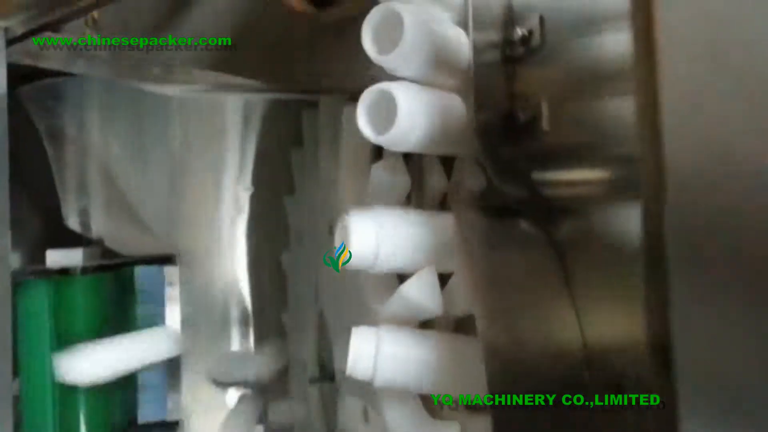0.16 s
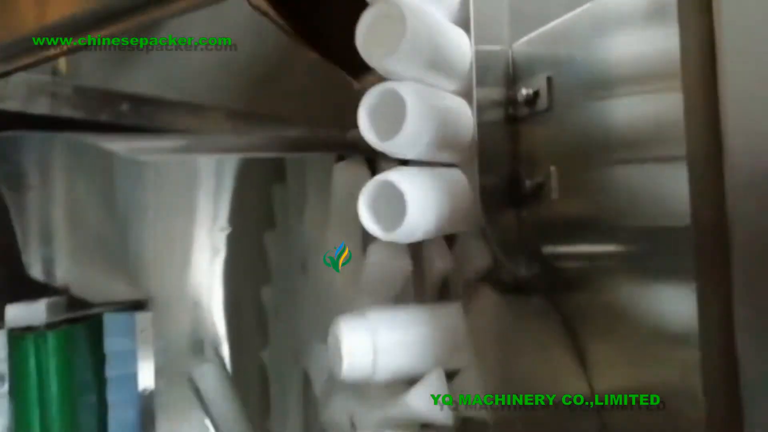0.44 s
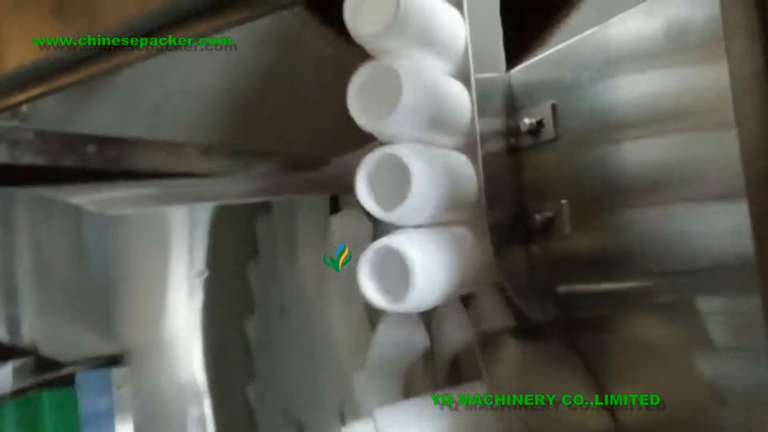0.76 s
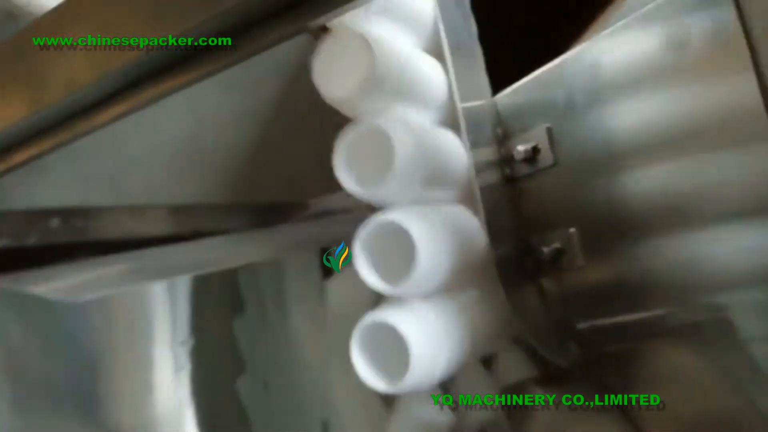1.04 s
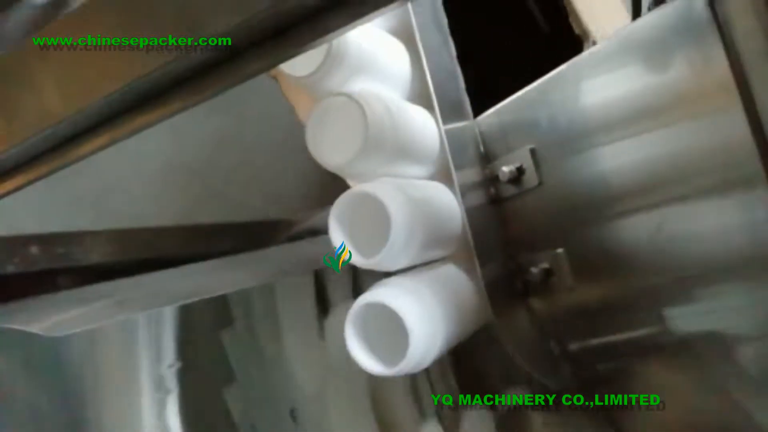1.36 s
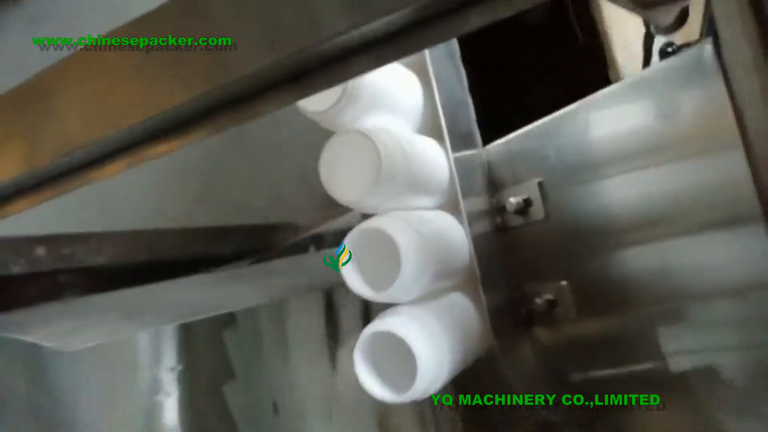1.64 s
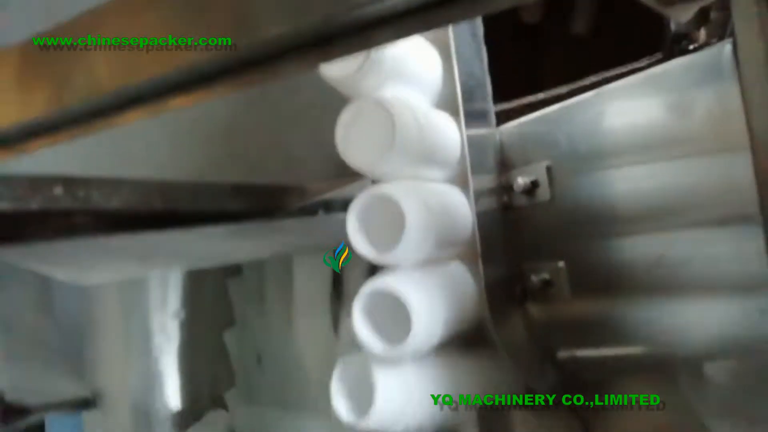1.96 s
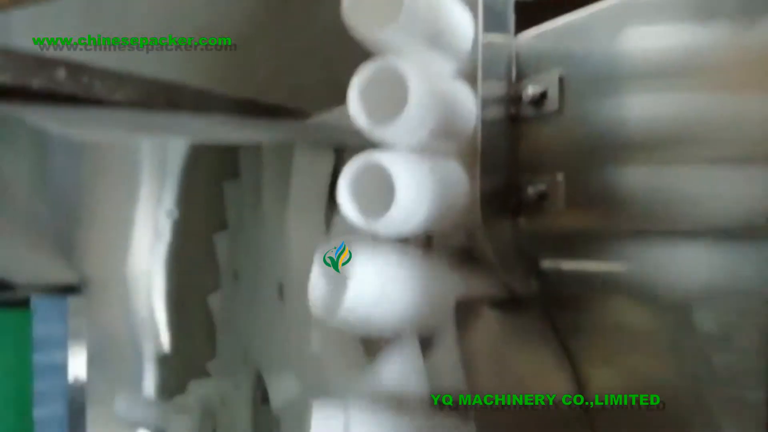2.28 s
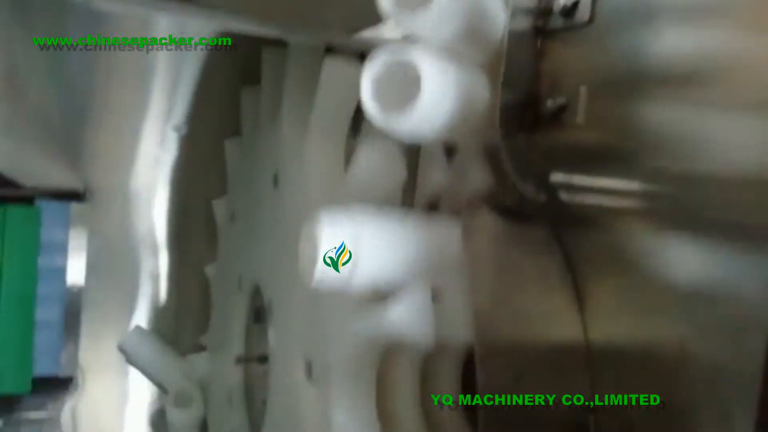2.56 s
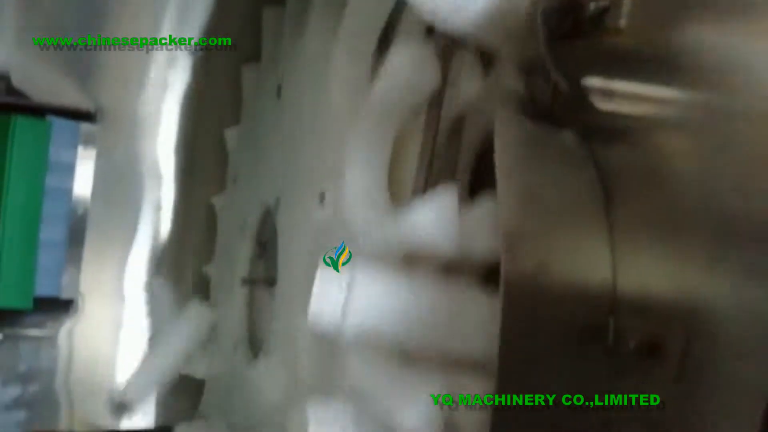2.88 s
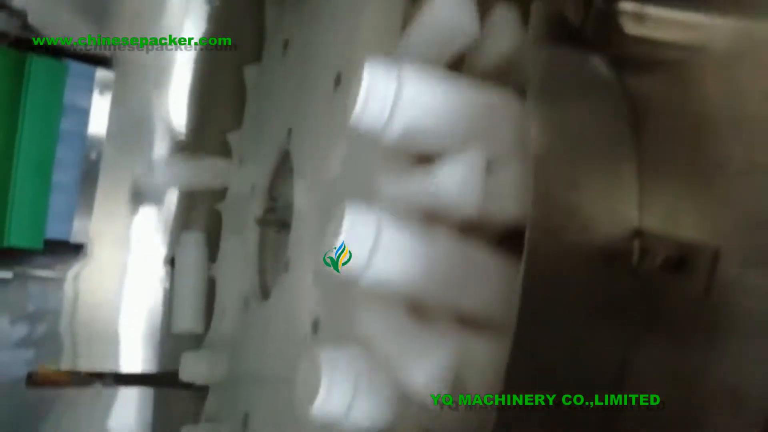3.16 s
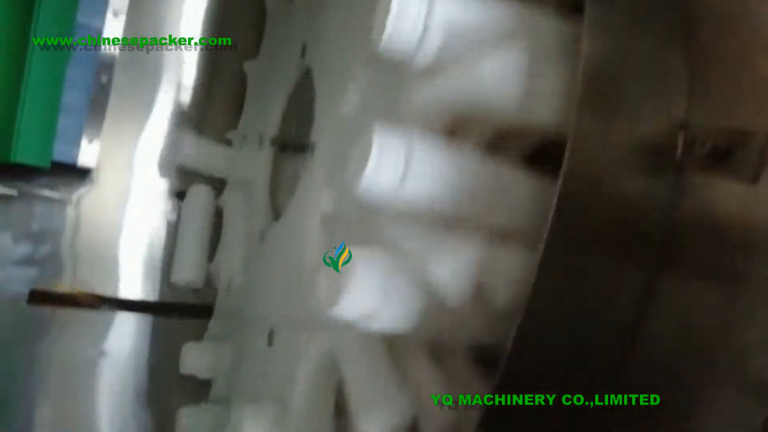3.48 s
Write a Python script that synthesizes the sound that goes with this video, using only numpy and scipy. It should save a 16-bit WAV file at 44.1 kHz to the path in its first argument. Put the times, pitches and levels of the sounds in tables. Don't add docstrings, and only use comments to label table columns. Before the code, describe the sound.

Empty plastic bottles tumble and rattle continuously in a rotary sorter, clacking on a rail and thumping on a plate, while an air jet hisses unevenly over drum rumble; close stereo microphones in a factory hall.

```python
import sys
import numpy as np
from scipy import signal
from scipy.fft import rfft, irfft
from scipy.io import wavfile

SR = 44100
rng = np.random.default_rng(int(sys.argv[2]) if len(sys.argv) > 2 else 0)


def persist_wave(psi):
    counts = np.round(np.clip(psi, -1, 1) * 32767).astype(np.int16)
    wavfile.write(sys.argv[1], SR, np.atleast_2d(counts).T)


def how_loud(loudness_db):
    steps = np.asarray(loudness_db, float) / 20
    return 10 ** steps


N = 159642

# t/s, spread/s, change/dB
WALL_SPLASHES = [(0.042, 0.017, -3.5), (0.317, 0.0069, 8.5), (0.361, 0.011, -1.5), (0.393, 0.0078, 6),
                 (0.439, 0.046, -5.5), (0.541, 0.02, 8.5), (0.664, 0.022, 7), (0.746, 0.058, -1),
                 (0.898, 0.029, 7), (1.08, 0.074, 3), (1.197, 0.015, 6.5), (1.383, 0.018, 8.5),
                 (1.481, 0.0092, 0), (1.704, 0.034, 4.5), (1.954, 0.0035, 12.5), (2.063, 0.028, 2),
                 (2.141, 0.14, 0), (2.283, 0.017, 8.5), (2.343, 0.053, -3.5), (2.42, 0.071, 3.5),
                 (2.616, 0.0049, 6.5), (2.772, 0.016, 7), (2.949, 0.1, -0.7), (3.113, 0.016, 4.5),
                 (3.468, 0.061, 1.5), (3.6, 0.017, 3)]
# t/s, spread/s, change/dB
HEAP_SLIDES = [(0.188, 0.072, 4.5), (0.315, 0.043, 4.5), (0.427, 0.018, -5), (0.637, 0.0058, 0.5),
               (0.74, 0.14, 7), (1.046, 0.036, -6.5), (1.203, 0.032, 6.5), (1.401, 0.011, 5.5),
               (1.535, 0.0096, 5), (1.7, 0.16, 5), (1.974, 0.054, 5), (2.149, 0.13, 8),
               (2.736, 0.032, -2.5), (3.316, 0.0072, 11.5), (3.504, 0.05, -3), (3.61, 0.013, 6.5)]
# t/s, spread/s, change/dB
HEAP_RESTS = [(0.07, 0.0091, -3), (0.565, 0.011, -4), (0.93, 0.0082, -5.5), (1.315, .02, -1.5),
              (1.45, .015, 0.5), (1.79, 0.0078, 1), (2.075, 0.015, -4), (2.32, 0.011, -5),
              (2.57, 0.017, -2.5), (2.67, 0.025, -3.5), (2.86, 0.016, -3.5), (3.26, 0.014, -2),
              (3.375, 0.016, -4.5), (3.555, 0.012, -4)]


def in_bumps(rows):
    t = np.arange(0, N + 64, 64) / SR
    db = sum(change * np.exp(-.5 * ((t - centre) / spread) ** 2) for centre, spread, change in rows)
    return np.interp(np.arange(N) / SR, t, db)


def rms_one(x):
    return x / np.sqrt(np.mean(x ** 2) + 1e-20)


def at_hz(points, hz):
    points = np.array(points)
    return np.interp(np.log(hz + 1), np.log(points[:, 0]), points[:, 1])


def drift(rate):
    pole = np.exp(-80 * np.pi * rate / SR)
    noise = rng.standard_normal(N // 40 + 2002)
    slow = signal.lfilter([1], [1, -2 * pole, pole * pole], noise)[2000:]
    return np.interp(np.arange(N) / 40, np.arange(len(slow)), rms_one(slow))


def turbulence(spectrum, patchy_db, rate, swing_db, swing_hz, fade, count=2.5):
    hz = np.fft.rfftfreq(N, 1 / SR)
    low, high = spectrum[0][0], spectrum[-1][0] * 1.2
    band_limit = np.sqrt((1 + (low / (hz + 1)) ** 8) * (1 + (hz / high) ** 8))
    colour = how_loud(at_hz(spectrum, hz)) / band_limit
    noise = rfft(rng.standard_normal((2, N))) * colour
    place = count * np.log2((hz + 1) / 20)
    audible = place[colour > .003]
    out = 0
    for k in range(int(audible.min()), int(audible.max()) + 2):
        share = np.cos(np.clip(place - k, -1, 1) * np.pi / 2) ** 2
        octaves_off = abs(k / count - np.log2(swing_hz / 20))
        level_db = patchy_db * drift(rate) + swing_db * max(1 - fade * octaves_off, 0)
        out = out + how_loud(level_db) * irfft(noise * share, N)
    return rms_one(out)


def jet():
    # t/s, spread/s, change/dB
    shades = [(0.018, 0.023, -2), (0.313, 0.0062, 4), (0.347, 0.012, -2.5), (0.425, 0.054, -10.5),
              (0.115, 0.0043, -6), (0.2, 0.023, 1), (1.22, 0.037, 0), (1.32, 0.038, 2.5),
              (3.14, 0.011, -0.5), (0.653, 0.02, 4), (0.746, 0.088, -3), (0.91, 0.0062, 4),
              (1.046, 0.012, -4), (1.363, 0.0042, 4.5), (1.441, 0.041, -1.5), (1.562, 0.0061, -6.5),
              (1.696, 0.042, 2.5), (1.742, 0.0083, -10), (1.9, 0.0025, -11), (2.061, 0.016, 5.5),
              (2.139, 0.062, -4), (2.295, 0.011, 2), (2.405, 0.01, 7), (2.444, 0.0074, -5),
              (2.504, 0.027, 2), (2.628, 0.047, 3.5), (2.758, 0.018, 5.5), (2.808, 0.0076, -7),
              (3.037, 0.075, 4), (3.406, 0.083, 3), (3.54, 0.028, -2)]
    # f/Hz, level/dB
    core_spectrum = [(4000, -10.5), (5200, -10.5), (5790, -14), (7000, -1.5), (8000, 3), (10100, -14),
                     (14400, -23.5), (16500, -25)]
    # f/Hz, level/dB
    splash_spectrum = [(800, -9), (1380, -6.5), (1650, -2), (2300, -1), (2650, -2.5), (3580, -4),
                       (4800, -4.5), (6500, -1.5), (9500, -19)]
    core_db, splash_db = -14.5, -22
    flutter_db = .7 * drift(30)
    core_swing_db = in_bumps(shades) + flutter_db
    core = turbulence(core_spectrum, 1.73, 15.4, core_swing_db, swing_hz=6700, fade=0.093, count=6)
    splash_swing_db = 1.03 * in_bumps(WALL_SPLASHES) + 1.07 * in_bumps(HEAP_RESTS) + flutter_db
    splash = turbulence(splash_spectrum, 2.12, 24.5, splash_swing_db, swing_hz=3760, fade=0.098)
    return how_loud(core_db) * core + how_loud(splash_db) * splash


def drum():
    # f/Hz, level/dB
    rumble_spectrum = [(25, -15), (75, -15), (125, -6.5), (180, -3.5), (395, -0.5), (466, 3), (700, -1.5),
                       (1300, -3.5)]
    rumble_db = -27.5
    swing_db = 0.78 * in_bumps(HEAP_SLIDES) + 0.28 * in_bumps(WALL_SPLASHES) + 1.8 * in_bumps(HEAP_RESTS)
    return how_loud(rumble_db) * turbulence(rumble_spectrum, 3.44, 12, swing_db, swing_hz=500, fade=0.063)


def ring(clicks, hz, t60):
    r, w = how_loud(-60 / (t60 * SR)), 2 * np.pi * hz / SR
    return signal.lfilter([0, np.sin(w)], [1, -2 * r * np.cos(w), r * r], clicks + 1e-18)


def rattle():
    # f/Hz, level/dB, t60/s
    hollows = [(173, -2, 0.12), (235, -18, 0.14), (318, -6, 0.055), (469.2, 2.5, 0.17), (579, -9.5, 0.056),
               (691.6, -6, 0.19), (1290, 8.5, 0.017), (1500, 9.5, 0.033), (1700, -5.5, 0.17),
               (2257, 3, 0.075), (3770, -1.5, 0.028)]
    contacts_per_s, rattle_db, spread_db = 250, -31, 6.5
    slide_db = in_bumps(HEAP_SLIDES) + 0.89 * in_bumps(HEAP_RESTS)
    splash_db = in_bumps(WALL_SPLASHES)
    touch = rng.random((2, N)) < contacts_per_s * how_loud(3.0 * drift(7)) / SR
    out = np.zeros((2, N))
    for hz, db, t60 in hollows:
        strength = how_loud(spread_db * np.minimum(rng.exponential(1, (2, N)), 2.6))
        sign = rng.choice([-1, 1], (2, N))
        effort_db = 0.62 * slide_db if hz < 800 else 0.56 * splash_db + 0.75 * slide_db
        out += ring(strength * sign * touch * how_loud(db + effort_db + 2.2 * drift(10.5)), hz, t60)
    return how_loud(rattle_db) * rms_one(out)


def blow(s, db, hz, t60, crack_db, draw):
    rise_s, crack_s = 0.00054, 0.0013
    t = np.arange(int(.2 * SR)) / SR
    modes = [(1, 1), (.35, 1.12 + .06 * draw[0]), (.2, .85 + .05 * draw[1])]
    body = sum(gain * np.sin(2 * np.pi * hz * ratio * t) for gain, ratio in modes)
    body = body * how_loud(-60 * t / t60) * (1 - np.exp(-t / rise_s))
    crack = signal.lfilter([.5, 0, -.5], [1, -1.3, .6], draw[2:len(t) + 2])
    crack = crack * np.exp(-t / crack_s) * how_loud(crack_db)
    out, start = np.zeros(N + len(t)), int(s * SR)
    out[start:start + len(t)] = how_loud(db) * (body + crack)
    return out[:N]


def thumps():
    # t/s, peak level/dB, f/Hz
    landings = [(0.175, -17.5, 455), (0.606, -16, 192), (0.64, -18.5, 159), (0.717, -22, 361),
                (0.746, -18.5, 183.5), (1.201, -19, 472), (1.387, -17, 288), (1.532, -13.5, 243),
                (1.543, -12.5, 338), (1.931, -18.5, 346), (3.146, -20.5, 353), (3.3, -17, 365),
                (3.318, -17, 204), (3.597, -17, 396), (0.087, -27, 464), (0.479, -26, 470),
                (0.965, -24.5, 304), (1.265, -24, 242), (1.621, -22, 404), (1.865, -24.5, 384),
                (1.994, -26, 470), (2.119, -25, 433), (2.156, -18.5, 342), (2.491, -24, 193),
                (2.6, -25, 465), (2.898, -24.5, 174), (2.939, -22.5, 315), (3.604, -21, 212),
                (0.672, -21, 213), (0.722, -19.5, 226), (0.772, -21, 375), (1.408, -25, 221),
                (1.566, -22.5, 295), (1.713, -22.5, 347), (2.029, -29, 168), (2.271, -21.5, 188),
                (2.13, -25, 176), (2.2, -23, 173)]
    draws = rng.standard_normal((len(landings), SR // 4)).clip(-3, 3)
    return sum(blow(s, db - 3, hz, 0.14, -46, draw) for (s, db, hz), draw in zip(landings, draws))


def clacks():
    # t/s, peak level/dB, f/Hz
    knocks = [(0.0915, -7.5, 1525), (0.105, -19, 1740), (0.1246, -11, 2280), (0.181, -16, 1550),
              (0.2728, -15.5, 1720), (0.3128, -15, 1515), (0.3884, -10, 2270), (0.8021, -5.5, 1533),
              (0.8589, -12.5, 2060), (0.9408, -14.5, 1680), (1.1722, -14, 1700), (1.1977, -10, 1700),
              (1.346, -13.5, 1460), (1.424, -11, 1525), (1.6157, -14.5, 2050), (1.8334, -12.5, 1250),
              (1.8704, -11, 1690), (2.259, -11, 1714), (2.61, -16, 1430), (3.2101, -15, 1500),
              (3.2839, -15.5, 930), (3.579, -11.5, 1713), (0.366, -15, 1910), (0.484, -18.5, 1540),
              (0.515, -18, 969), (0.597, -18.5, 1080), (0.642, -23, 1630), (0.748, -22, 880),
              (0.831, -17, 1130), (0.878, -12, 1390), (1.129, -21, 1560), (1.389, -15.5, 1130),
              (1.535, -20, 1260), (1.641, -25, 1600), (1.705, -19, 1630), (1.95, -17, 1860),
              (2.156, -21, 920), (2.175, -17, 820), (2.274, -15, 1310), (2.451, -16, 1170),
              (2.849, -17.5, 1680), (2.924, -16.5, 1490), (3.148, -16, 1520), (3.173, -20.5, 1470),
              (3.287, -13, 1415), (1.824, -14, 885), (1.936, -20, 1500), (2.024, -18, 1610),
              (2.5, -15, 1600), (2.808, -18, 2090), (2.99, -23, 1500), (3.425, -19, 1700),
              (1.427, -13, 3900), (1.703, -17, 4600), (1.951, -9, 3500), (3.105, -15, 5000)]
    draws = rng.standard_normal((len(knocks), SR // 4)).clip(-3, 3)
    out = np.zeros((2, N))
    for (s, db, hz), draw in zip(knocks, draws):
        pan = how_loud(3.7 * draw[2] * np.array([[1], [-1]]))
        out += blow(s, db - 1, hz, 0.04, -2, draw) * pan
    out[0] = np.roll(out[0], 5)
    return out


def slaps():
    # t/s, peak level/dB, f/Hz
    flat_landings = [
        (0.1969, -17.5, 684),
        (1.5178, -11, 655),
    ]
    t = np.arange(N) / SR
    out = np.zeros(N)
    for s, db, hz in flat_landings:
        bell = np.exp(-.5 * ((t - s) * hz * 3.2) ** 2)
        out += how_loud(db + 9) * np.sin(2 * np.pi * hz * (t - s)) * bell
    return out


def ports(field):
    # f/Hz, likeness/1
    likeness = [(60, .93), (300, .78), (520, .85), (730, .3), (1400, .7), (2400, .65), (3100, .2),
                (9000, .12)]
    # f/Hz, lead/rad
    lead = [(100, .01), (260, 0.059), (600, 3.08), (860, 0.33), (1810, 0.87), (2410, 2.26), (3530, 5.5),
            (5250, 1.62)]
    # f/Hz, difference/dB
    port_tilt = [(150, -1), (400, -3), (700, 6.5), (1400, 1), (1950, -6), (2700, 0), (7500, -2.5),
                 (9500, 2.5)]
    hz = np.fft.rfftfreq(N, 1 / SR)
    a, b = rfft(field)
    alike = np.clip(at_hz(likeness, hz), 0, 1)
    right = alike * a * np.exp(-1j * at_hz(lead, hz)) + np.sqrt(1 - alike ** 2) * b
    tilt = how_loud(at_hz(port_tilt, hz) / 2)
    return irfft(np.array([a * tilt, right / tilt]), N)


def hall(x):
    t60, tail_db = .35, -11
    t = np.arange(int(.6 * SR)) / SR
    tail = rng.standard_normal((2, len(t))) * how_loud(-60 * t / t60) * (t > .008)
    tail = tail / np.sqrt(np.sum(tail ** 2) / 2)
    return how_loud(tail_db) * signal.fftconvolve(x, tail, axes=1)[:, :N]


def scene():
    near = thumps() + clacks() + slaps()
    return ports(jet() + drum() + rattle()) + near + hall(near)


def roll_off(x):
    return signal.sosfilt(signal.butter(12, 15900, fs=SR, output="sos"), x)


def record(dry):
    top = 1.05
    x = signal.sosfilt(signal.butter(2, 68, "high", fs=SR, output="sos"), dry)
    return roll_off(top * np.tanh(x / top))


dry = scene()
out = record(dry)
persist_wave(out)
```